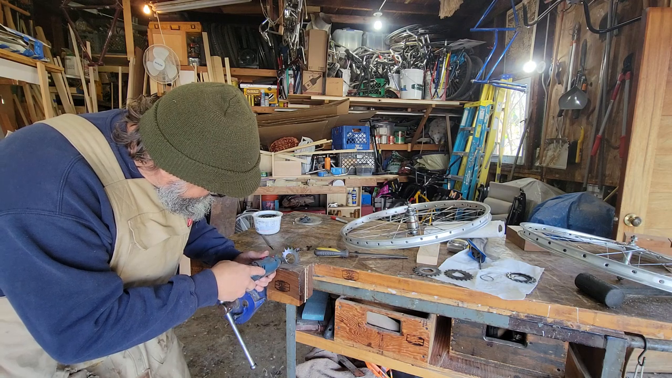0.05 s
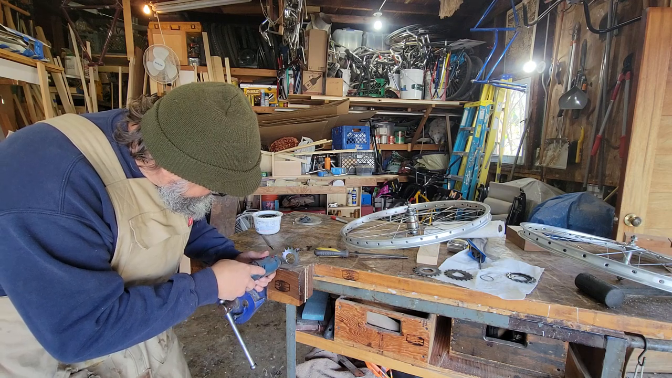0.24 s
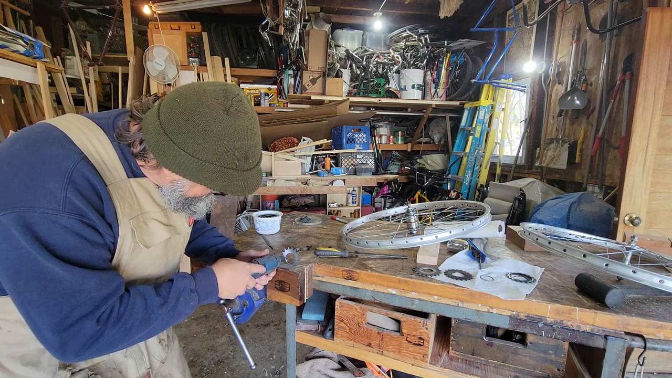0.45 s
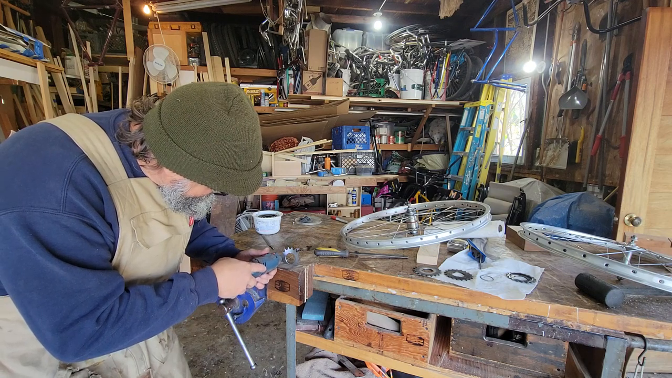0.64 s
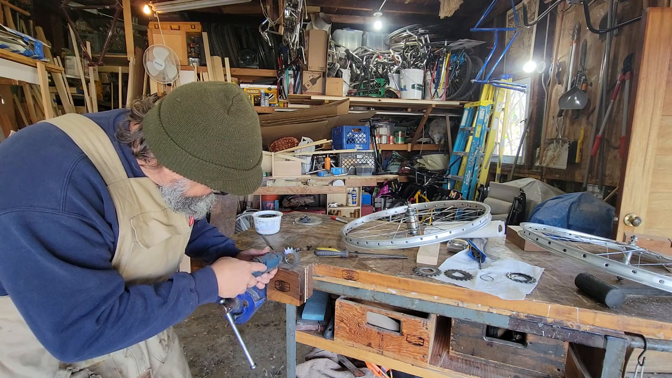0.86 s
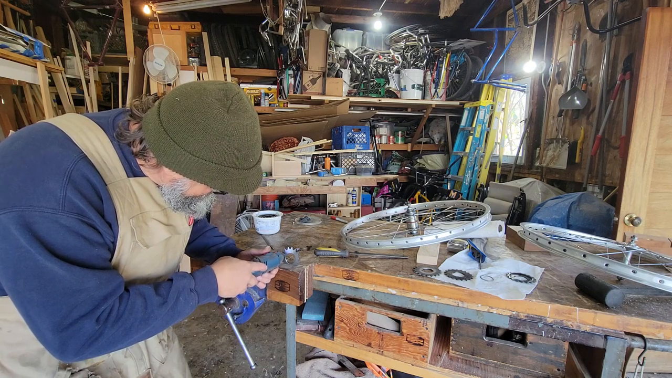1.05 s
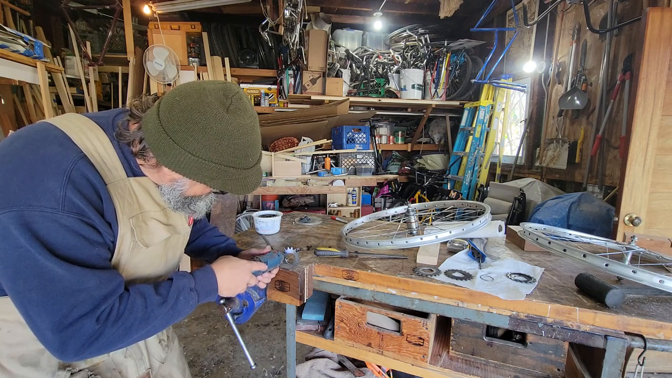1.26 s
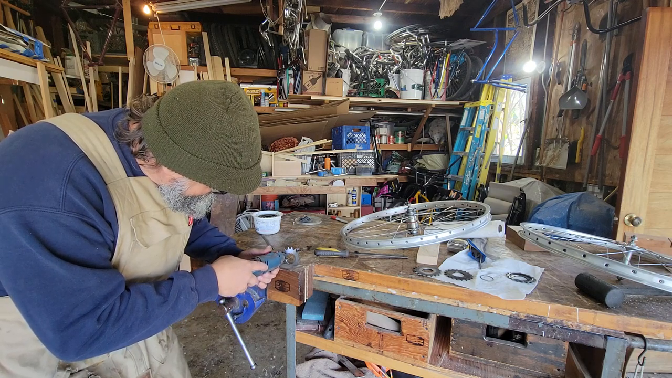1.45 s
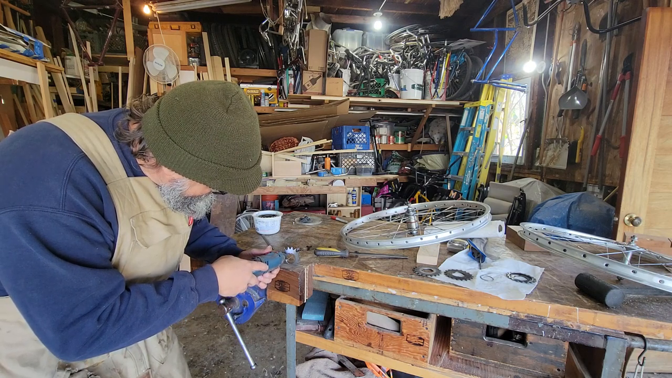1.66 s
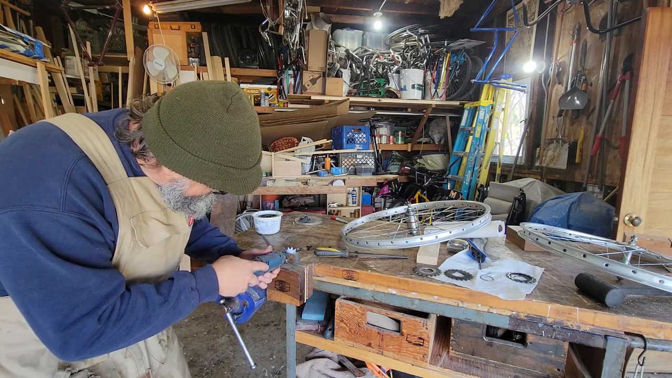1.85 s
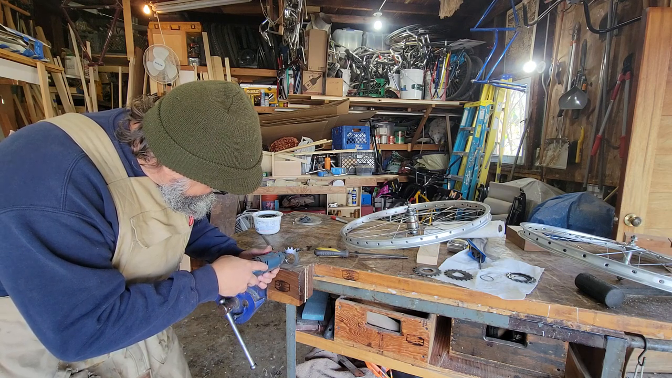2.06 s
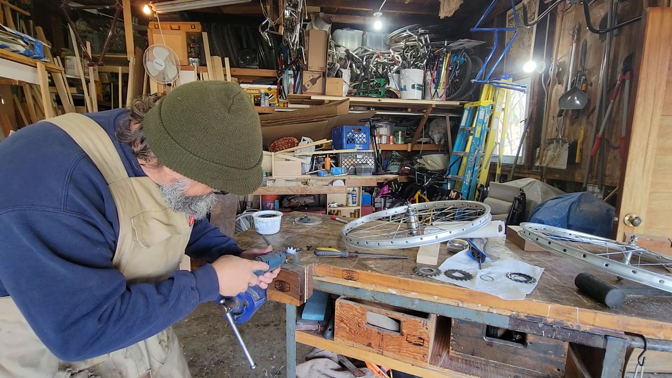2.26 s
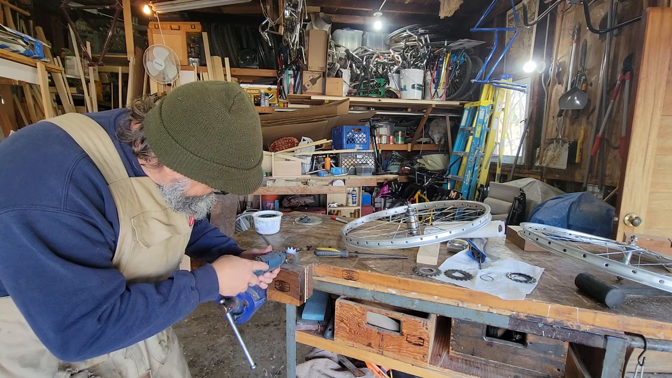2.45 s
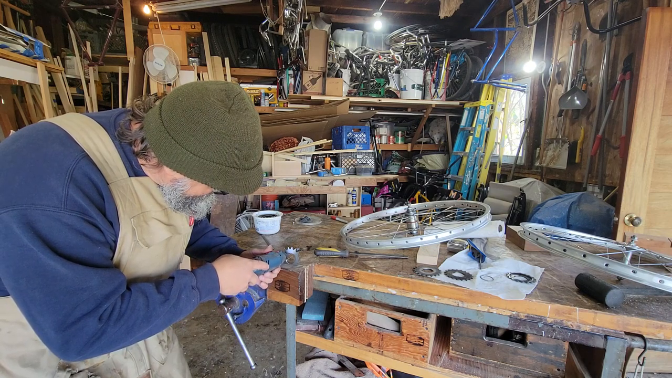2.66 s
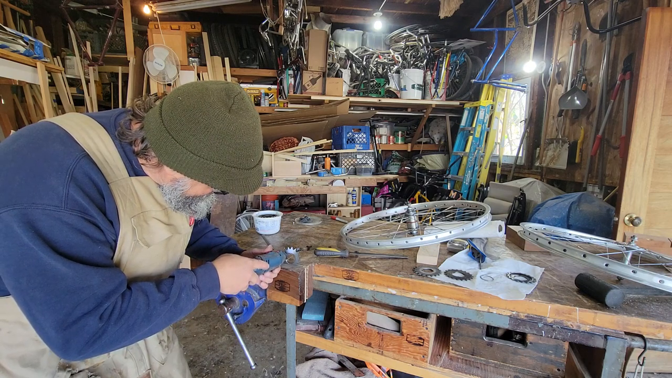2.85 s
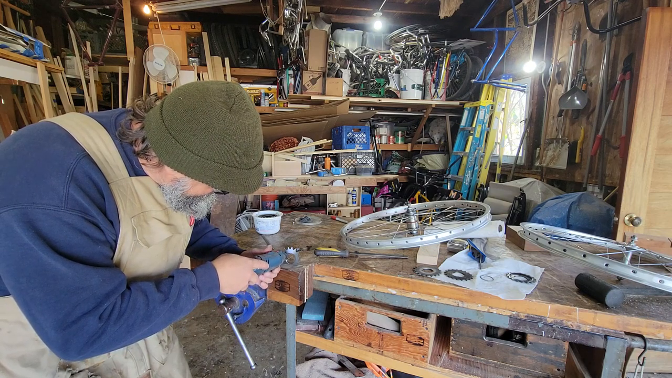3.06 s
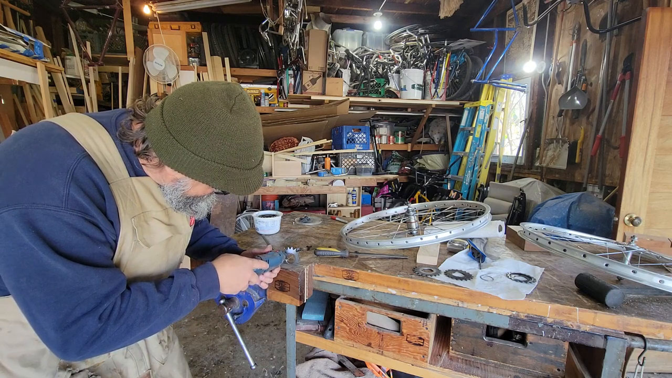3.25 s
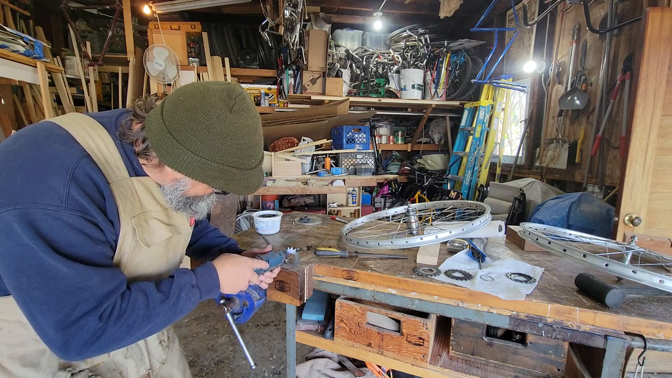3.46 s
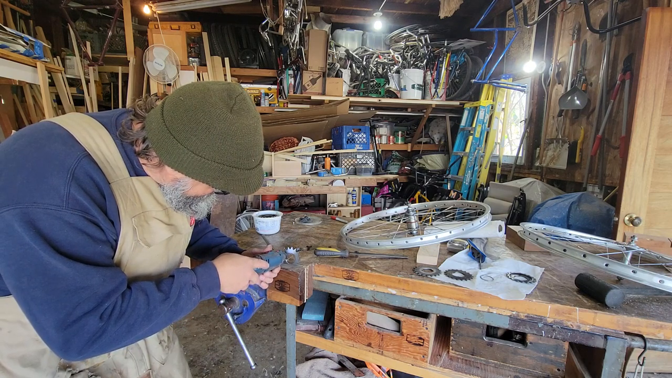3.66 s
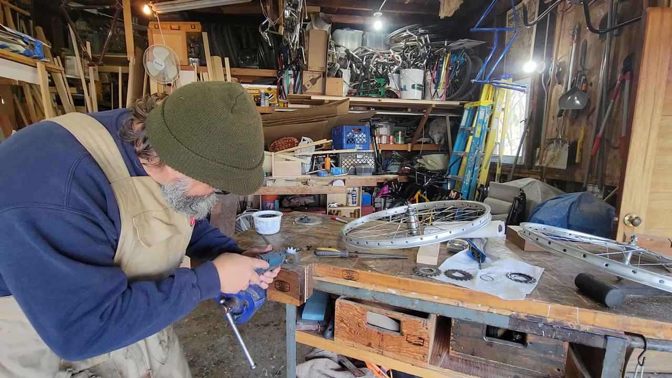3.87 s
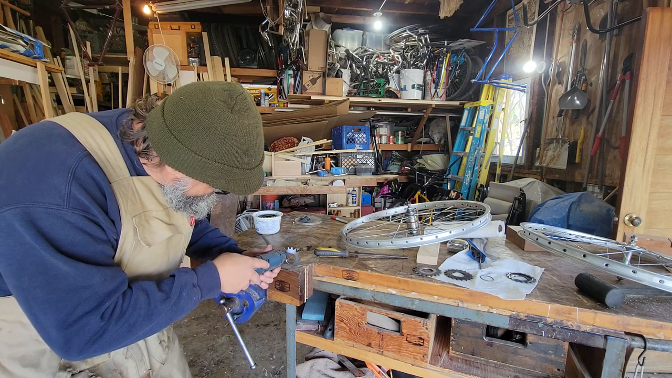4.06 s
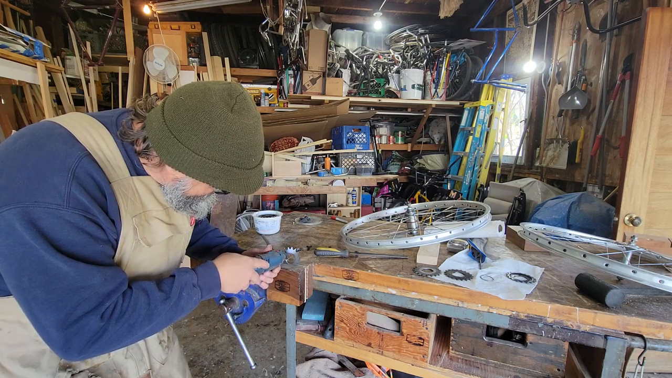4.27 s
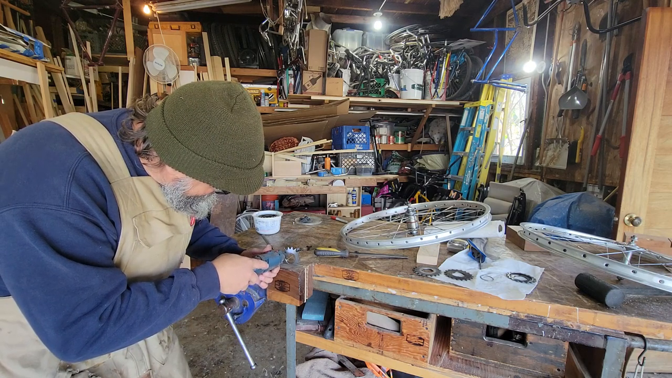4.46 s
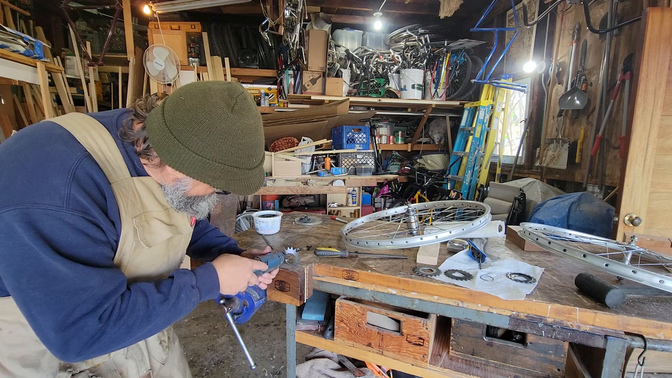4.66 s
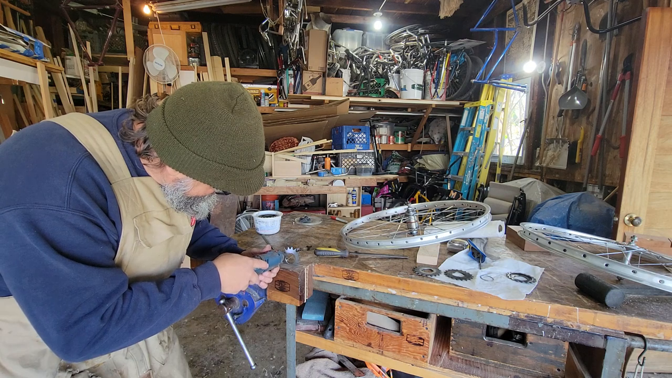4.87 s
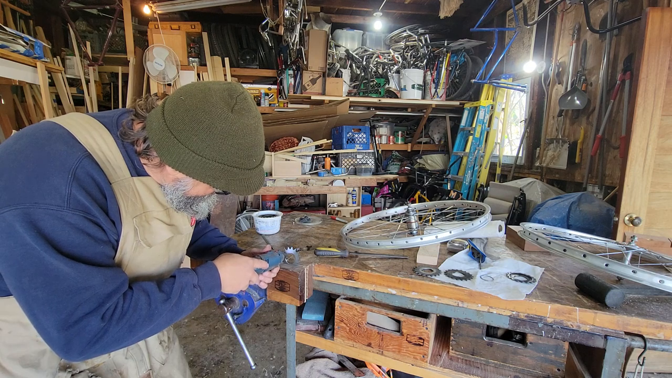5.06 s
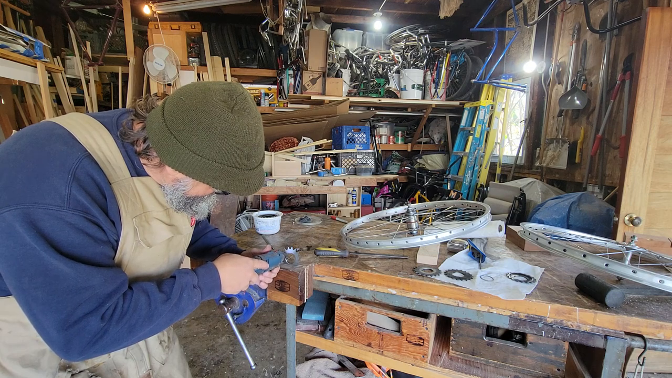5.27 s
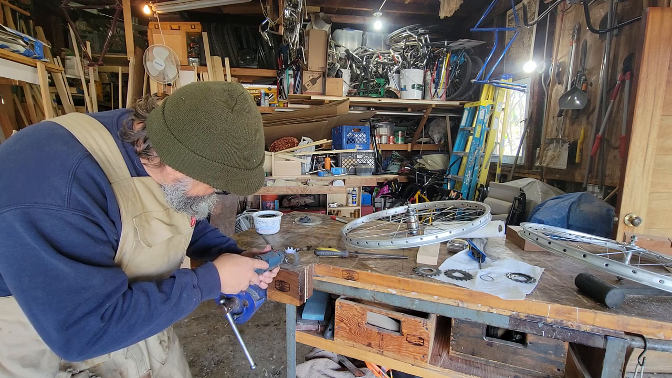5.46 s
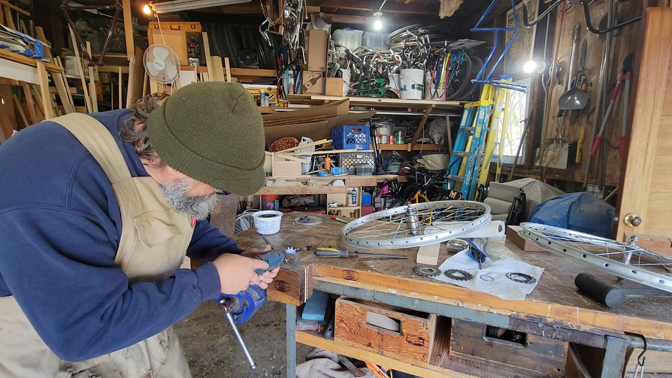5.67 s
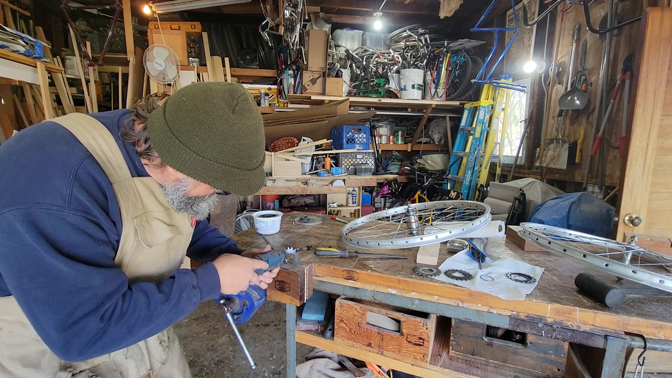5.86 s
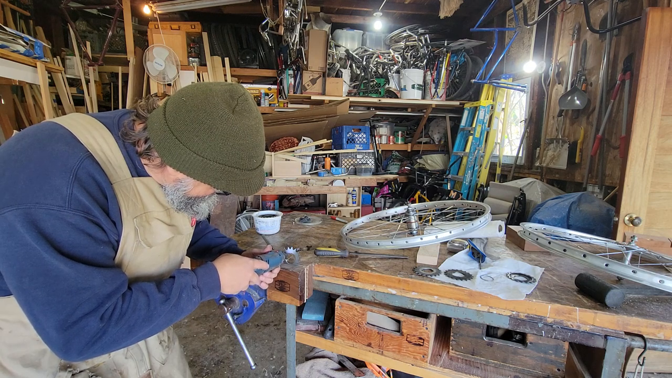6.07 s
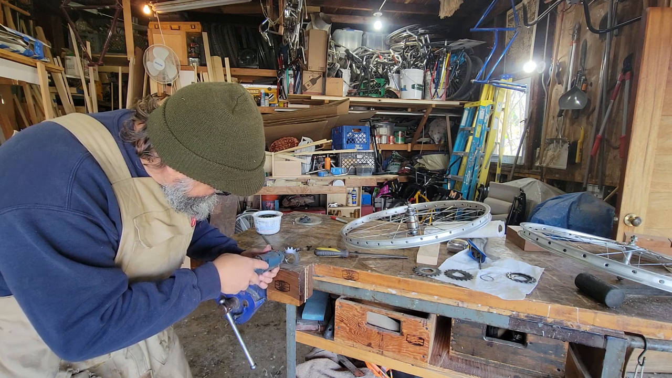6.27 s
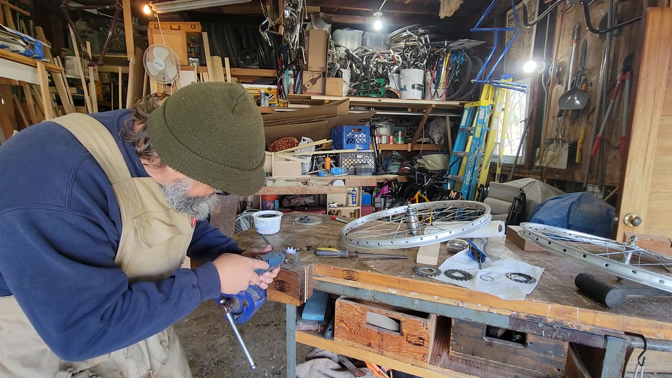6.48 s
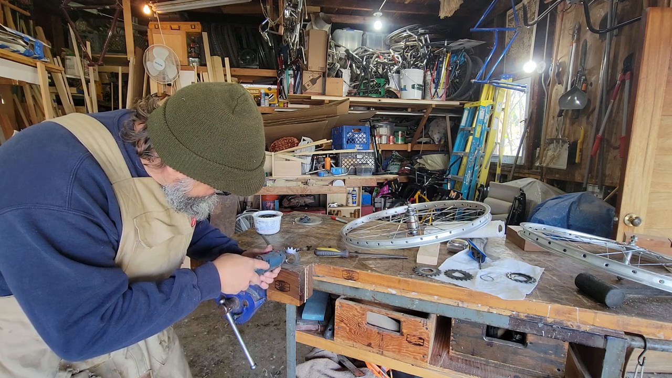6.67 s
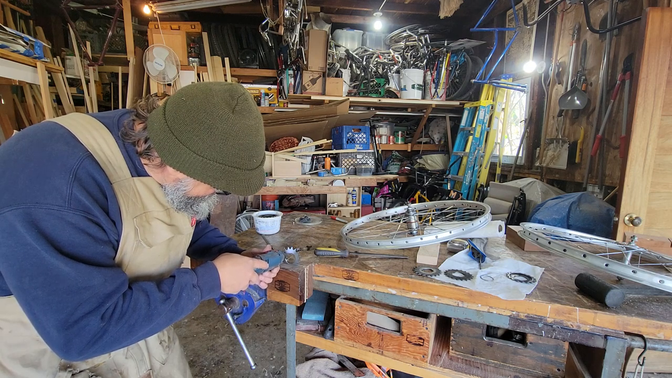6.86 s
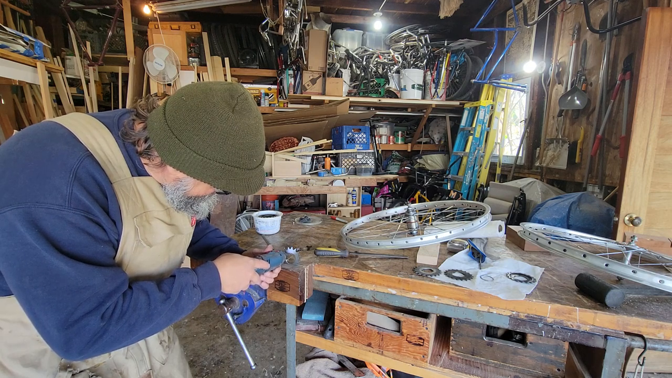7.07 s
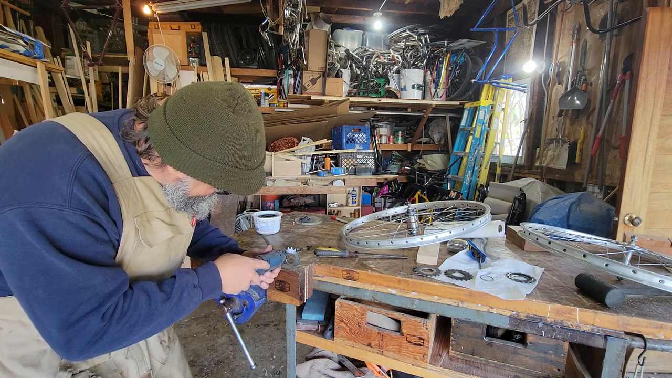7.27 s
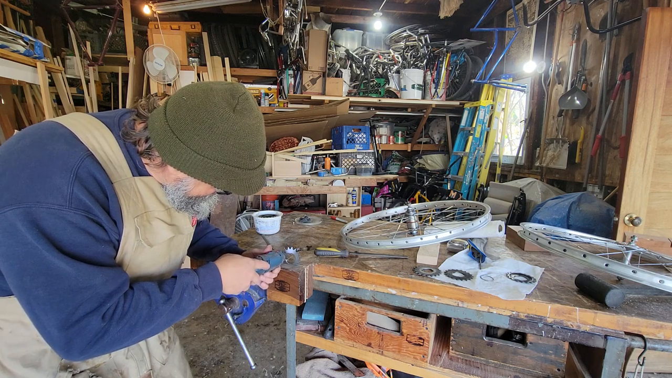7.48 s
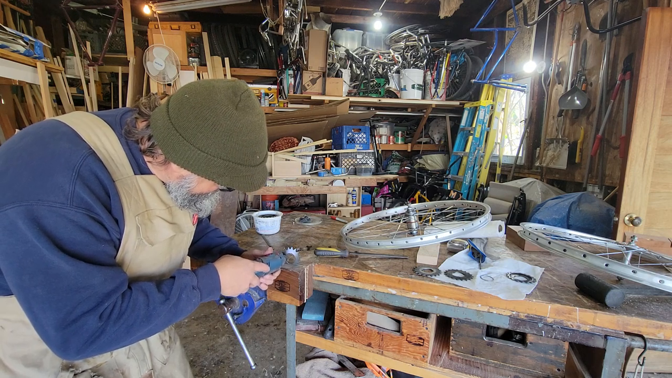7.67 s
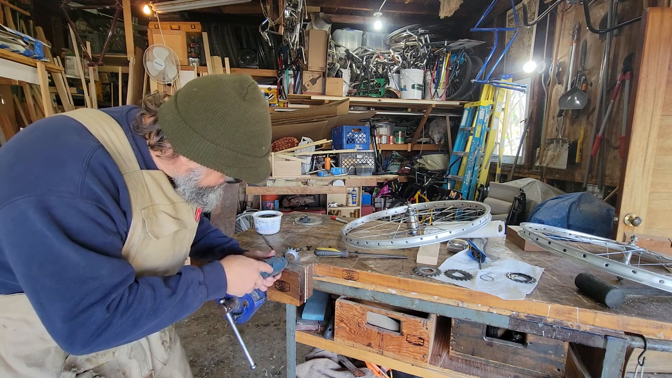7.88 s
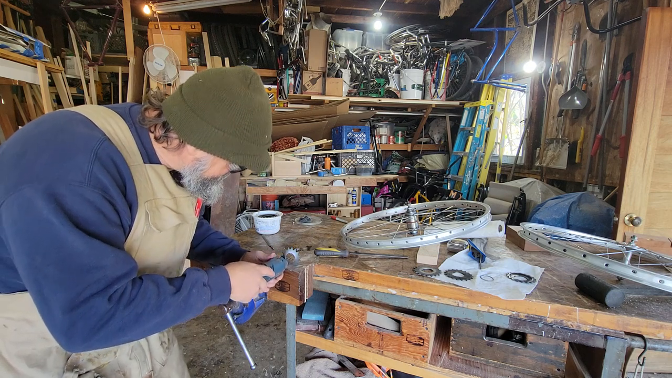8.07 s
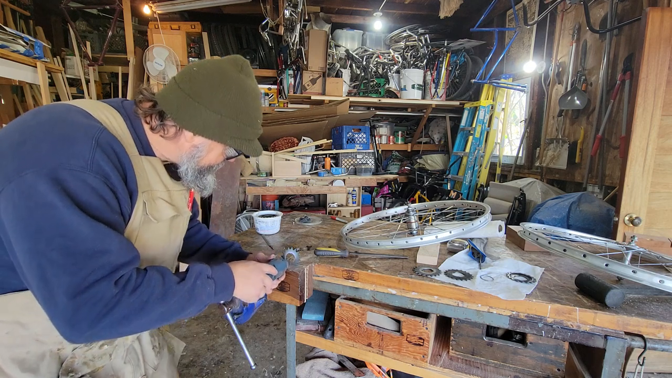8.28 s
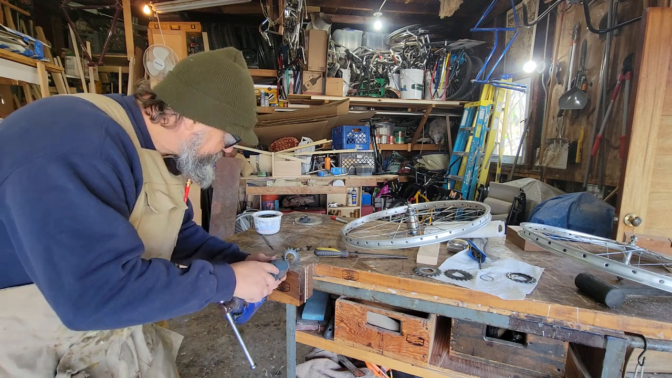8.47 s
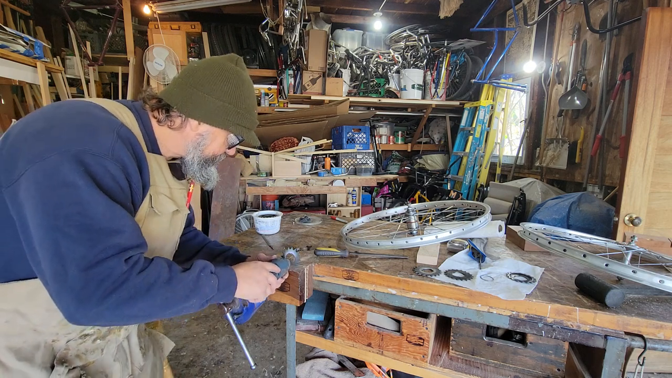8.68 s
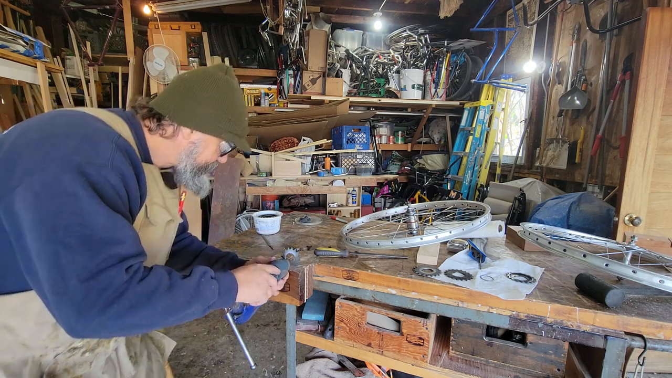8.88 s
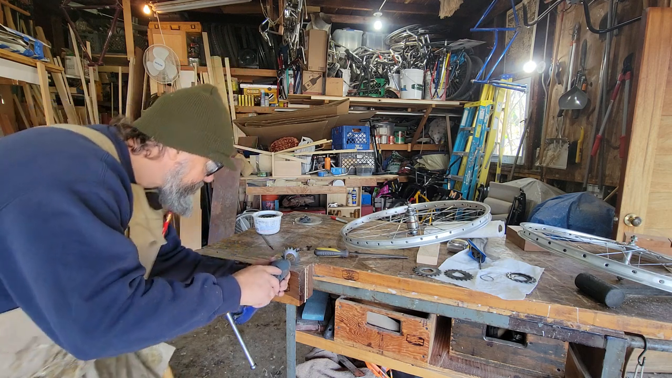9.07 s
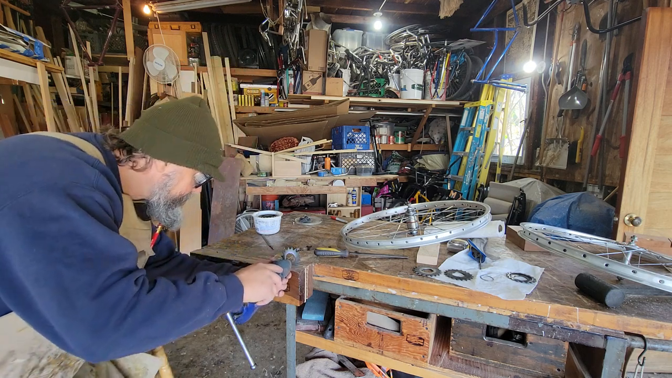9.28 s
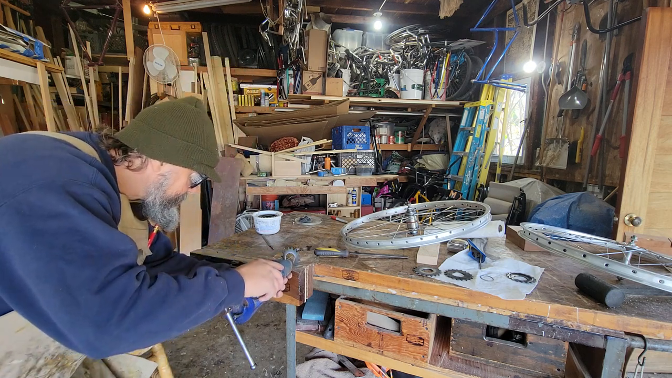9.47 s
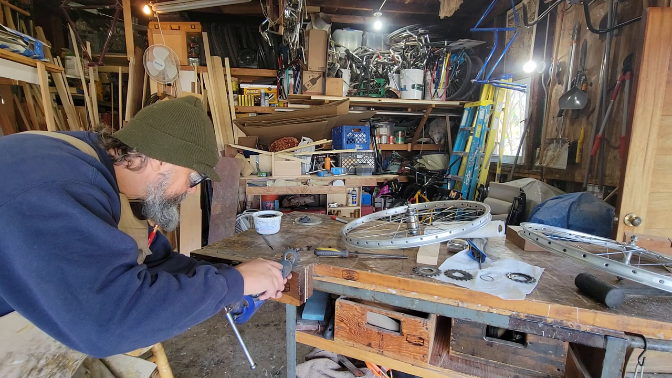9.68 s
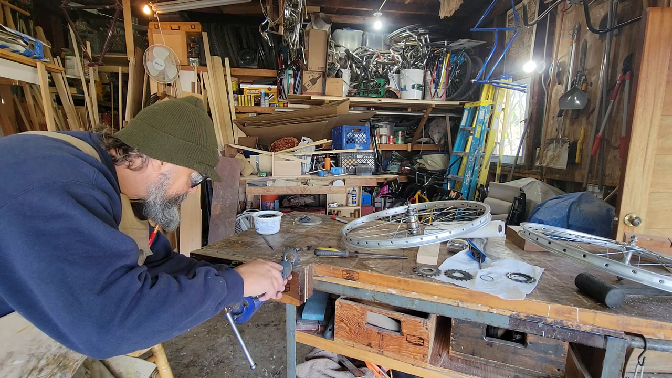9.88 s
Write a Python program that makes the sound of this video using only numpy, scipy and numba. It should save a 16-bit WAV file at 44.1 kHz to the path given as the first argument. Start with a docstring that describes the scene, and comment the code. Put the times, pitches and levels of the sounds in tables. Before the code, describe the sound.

Gritty, buzzing grinding of metal by a small electric tool, with one short lift, ends in steady motor whine and a brief wooden floor scuff.

```python
"""First comes the rasp of a rotary tool grinding a metal rod clamped at a workshop bench, left of a two-port
microphone. Blows once a turn build harmonics, pulsed noise makes the grit, and the shaft runs slower under load.
Twice the bit lifts and steady motor and bearing tones whine freely. Near the end wood scuffs and knocks on the
floor, as uneven pushes ringing resonances. Behind it all lie fan hiss and low room rumble, both shaped noise."""
import sys
import numpy as np
from scipy import signal
from scipy.io import wavfile
from scipy.ndimage import uniform_filter1d
from numba import njit

SR = 44100
rng = np.random.default_rng(int(sys.argv[2]) if len(sys.argv) > 2 else 0)


def log_audio(samples):
    """Write samples as a 16-bit WAV file to the path given in sys.argv[1]."""
    # one column per channel
    frames = np.atleast_2d(samples).T
    # limit to full scale, then quantise
    limited = np.clip(frames, -1, 1)
    pcm = np.round(limited * 32767).astype(np.int16)
    wavfile.write(sys.argv[1], SR, pcm)


N = 437904
HOP = 128  # samples per control frame

# Harmonics of the blow at usual pressure: [shaft multiple, level in first cut/dB, level in second cut/dB]
BLOW_HARMONICS = [(1, -42.5, -41), (2, -42.5, -41.5), (3, -31.5, -33), (4, -36, -36), (5, -32.5, -30),
                  (6, -40.5, -32), (7, -33, -27), (8, -38, -36), (9, -37.5, -39), (10, -34.5, -38.5),
                  (11, -35, -29.5), (12, -34.5, -32.5), (13, -31.5, -29), (14, -32.5, -30),
                  (15, -37.5, -36), (16, -37.5, -37.5), (17, -35.5, -31), (18, -38.5, -37),
                  (19, -45, -39.5), (20, -43, -40.5), (21, -45, -44), (22, -44.5, -41), (23, -43, -45),
                  (24, -48, -43), (25, -45, -42.5), (26, -50, -42), (27, -44, -45.5), (28, -46, -47),
                  (29, -46.5, -43.5), (30, -49, -44), (31, -53, -53), (32, -40, -44), (33, -46, -42),
                  (34, -42, -46), (35, -45, -42), (36, -49, -44), (37, -49, -37), (38, -44, -43),
                  (39, -48, -54), (40, -46, -41), (41, -44, -44), (42, -48, -44)]
# First shaft multiple of each zone of the rod and vice: [shaft multiple]
ZONE_STARTS = [1, 2, 3, 4, 5, 6, 7, 9, 15, 20, 43]
# How hard the bit presses: [t/s, level about the usual pressure/dB]
PRESSURE = [(0.0, 6), (0.07, -5.5), (0.1, 3.5), (0.15, 1), (0.32, 4.5), (0.38, 3.5), (0.44, 8.5),
            (0.52, 9.5), (0.62, 3), (0.89, 0.5), (1.11, -3), (1.16, 10.5), (1.25, 3), (1.42, -2),
            (1.52, -8), (1.59, 0.5), (1.74, 0.5), (1.85, -3.5), (2.12, -0.5), (2.24, -15), (2.28, -2.5),
            (2.48, -4.5), (2.52, -8), (2.69, -0.5), (2.73, -1.5), (3.27, -3), (3.34, -6), (3.38, -2),
            (3.43, -5.5), (3.48, 1), (3.54, -11), (3.58, -2), (3.7, 0.5), (3.73, -9), (3.76, -1), (3.87, 3),
            (3.95, -4.5), (3.99, 4.5), (4.16, 1.5), (4.28, 7), (4.33, -1), (4.42, -6), (4.88, -13.5),
            (5.1, -2), (5.37, 2), (5.59, 4.5), (5.66, -2.5), (5.7, 5), (5.83, 0), (5.88, -2.5), (5.95, 11),
            (6.0, 7.5), (6.11, 3.5), (6.16, -4), (6.27, 1.5), (6.32, -9), (6.39, 5), (6.48, 9),
            (6.57, -10.5), (6.65, -1), (6.72, -10), (6.79, 3), (6.92, -1), (6.96, 2), (7.01, 0.5),
            (7.05, -13), (7.09, -4.5), (7.14, -8), (7.39, -5), (7.46, 2.5), (7.52, 3.5), (7.56, -14.5)]
# Slow change of colour as the bit moves over the rod:
# [t/s, level of low multiples/dB, of the third/dB, of the fifth and sixth/dB, of the seventh and eighth/dB]
ROD_COLOUR = [(0.0, -2, -3, 7, 1), (0.11, -11, -10.5, -2.5, 1.5), (0.38, 2.5, 4.5, 4.0, 1),
              (0.6, -5.5, -0.5, 1.0, -6.0), (1.0, -2.0, -1.5, -4.5, 5), (1.05, 1.0, -5, -7, 9.5),
              (1.16, -9.5, -1, -3, -3.5), (1.36, -3, -4.5, -4, -4), (1.78, -11, 1, -4.5, 0.5),
              (1.87, -4, 1.5, -4.5, 0.5), (2.66, -5, 3, -2, -4.5), (3.12, 9.5, -6, 1.5, -1),
              (3.22, 2, -0.5, 1.0, 0.0), (3.37, 10.0, -2.5, 3.5, -1.5), (4.13, 5.5, -1.5, 4.5, -4),
              (4.42, 12.5, -1.5, 4, 2), (4.88, -2, 5, 2.0, -4), (5.09, -2, 1.0, -5, -2),
              (5.13, -2.0, 7.5, -3.5, -3), (5.4, -1, 9, 4, -1.0), (5.76, 0, -8.0, -1.5, 3.5),
              (6.07, -1, -2.5, 2.0, 0), (6.71, 0.5, -3, -2, -1.0), (6.97, -4, 9, 1.0, -1.5),
              (7.16, -3, -6, -3.5, 2.0), (7.3, 7.5, -4, 0, -1), (7.42, 1, -13, -6.0, 2.5),
              (7.48, -6, -6, -0.5, 2), (7.56, -3, -7, 5.5, -3)]
# Response, one row a zone: [pressure/(dB per dB), then the four colour columns/(dB per dB)]
ZONE_RESPONSE = [(0.22, 0.98, 0.097, 0, -0.23), (0.18, 0.32, 0.053, 0.21, 0.25),
                 (.15, -0.028, 0.96, -0.036, 0.14), (0.77, .95, .2, -0.25, 0.34),
                 (0.8, 0.17, 0.15, 0.79, 0.14), (1.05, -.1, -0.12, 1.27, -0.31),
                 (0.59, 0.095, -0.11, 0.29, 0.97), (0.51, 0.011, 0.075, -0.38, 0.18),
                 (0.82, -0.26, 0.12, -0.55, -0.53), (0.71, 0.051, 0, -0.54, -0.085)]


def strikes(t, loose_low=0.087, loose=0.43, drift_hz=23.0, slip=0.0086, spread=2.12, chatter_db=1.8, sway_db=2.14):
    """Harmonics of one blow a turn; the contact point wanders, so each swells and fades by itself."""
    orders, first_db, second_db = np.transpose(BLOW_HARMONICS)
    zone = np.searchsorted(ZONE_STARTS, orders, "right") - 1
    zones = len(ZONE_RESPONSE)

    controls = [*follow(PRESSURE, t), *follow(ROD_COLOUR, t)]
    sway_share = np.minimum(np.arange(zones) + 0.78, 1)[:, None]  # the lowest zone sways less
    zone_db = np.array(ZONE_RESPONSE) @ controls + sway_db * sway_share * wander(zones, 6.7).real
    cut_db = np.where(t < TOUCHES[1][0], first_db[:, None], second_db[:, None])
    level = gain_of(cut_db + zone_db[zone])
    # The bit chatters; the lowest hum is left out of it.
    chatter = gain_of(chatter_db * (orders > 1)[:, None] * wander(1, 25.0).real)
    level = level * chatter * judder(t, orders)

    chance = np.where(orders < ZONE_STARTS[7], loose_low, loose)[:, None]  # share of power that wanders
    left = np.sqrt(1 - chance) + np.sqrt(chance) * wander(len(orders), drift_hz)
    other = wander(len(orders), 1.74)
    other = other / (abs(other) + 0.036)  # echoes turn the phase at the far port more than the level

    late = slip * wander(1, 21.0).real + 0.0029 * wander(1, 84.0).real  # blow early or late, in turns
    angle = spread * rng.standard_normal((len(orders), 1)) + 2 * np.pi * orders[:, None] * late
    ports = pair(left, other, orders * 368, direct=0.98)
    return orders, np.sqrt(2) * level * contact(t, size=1) * np.exp(1j * angle) * ports


def judder(t, orders, beat_hz=53.0, first=3, last=8):
    """A skidding bit shakes the rod: harmonics first to last beat, each at its own moment."""
    shaken = (orders >= first) & (orders <= last)
    beat = np.exp(2j * np.pi * (beat_hz * t + rng.random((len(orders), 1))))
    depth = np.transpose(SKID_FLARES)[4] @ skids(t)
    return 1 + shaken[:, None] * depth * beat


# Skids, where the rasp flares:
# [t of the top/s, length/s, level under 3 kHz/dB, level above/dB, judder depth/0-1]
SKID_FLARES = [(0.304, 0.33, -25.5, -22.5, 0.86), (1.14, 0.11, -38, -24, 0.4), (2.88, 0.13, -38, -33, 0.3),
               (3.74, 0.16, -25.5, -27.5, 0.55), (4.415, 0.065, -28, -36, 0.5), (4.89, 0.15, -29, -28, .3),
               (6.596, 0.17, -29, -27, 0.7), (6.844, 0.083, -40, -32, 0.3), (7.085, .07, -24.5, -22, .4),
               (7.522, .1, -33, -28, 0.5)]


def skids(t):
    """Smooth rise and fall 0-1 of each skid."""
    top, length = np.transpose(SKID_FLARES)[:2, :, None]
    return np.cos(np.pi * np.clip((t - top) / length, -.5, .5)) ** 2


# Bit on the rod: [t the bit meets the rod/s, t it lifts/s]
TOUCHES = [(0, 4.438), (4.868, 7.575)]


def contact(t, size, ring_db_per_s=407):
    """1 while the bit is on the rod, dying away after it lifts; size smooths over samples of t."""
    held = sum((t >= start) * gain_of(-ring_db_per_s * np.maximum(t - end, 0)) for start, end in TOUCHES)
    return uniform_filter1d(held, size=size)


# Steady grit rasp at usual pressure: [t/s, level under 3 kHz/dB, level above/dB]
RASP_LEVEL = [(0, -36, -30.5), (.7, -48, -30.5), (1.3, -35, -32), (1.8, -41, -45), (2.1, -34.5, -31),
              (2.64, -36.5, -34), (3, -32, -28.5), (3.7, -34, -31), (4.4, -39, -31), (5, -34, -28.5),
              (5.5, -41, -30.5), (6.1, -41, -32), (6.8, -36.5, -29.5), (7.4, -38, -32)]
# Colour of the grit noise, relative: [f/Hz, level per Hz/dB]
GRIT_SPECTRUM = [(200, -41), (550, -25), (900, -15.5), (1300, -5.5), (2800, -9), (3500, -9), (4300, 1),
                 (6300, 3.5), (7300, -4.5), (10800, -5), (12400, -2), (15600, -12)]
# Bounces of the bit on the rod: [t/s, level of the blow/dB]
BOUNCES = [(4.465, -4), (4.871, -5), (4.894, -2)]
# Resonances of the tapped rod: [f/Hz, width/Hz, relative level/dB]
ROD_MODES = [(407, 18, -2.5), (1140, 120, -0.5), (1820, 120, -1), (2600, 220, -6), (5000, 300, -19),
             (6200, 300, -11)]


def rasp(turns, depth=0.27, split_hz=3400, bite=0.15):
    """Grit tearing at the metal: noise that pulses once a turn while the bit touches, and a few bounces."""
    t = np.arange(N) / SR

    def low_db(hz):
        return read(GRIT_SPECTRUM, hz) - 10 * np.log10(1 + (hz / split_hz) ** 8)

    def high_db(hz):
        return read(GRIT_SPECTRUM, hz) - 10 * np.log10(1 + (split_hz / (hz + 1)) ** 8)

    low = hiss(low_db, patchy_db=-2.0)
    high = hiss(high_db, patchy_db=5.5)
    power = gain_of(follow(RASP_LEVEL, t) + bite * follow(PRESSURE, t)) ** 2
    power = power + gain_of(np.transpose(SKID_FLARES)[2:4]) ** 2 @ skids(t) ** 2
    low_gain, high_gain = np.sqrt(power)

    pulse = evened(1 + depth * np.cos(2 * np.pi * turns))
    grit = (low_gain * evened(low) + high_gain * evened(high)) * contact(t, size=60) * pulse
    blows = np.zeros((2, N))
    for s, db in BOUNCES:
        blows[:, round(s * SR)] = gain_of(db)
    return grit + signal.oaconvolve(blows, ringing(ROD_MODES), axes=1)[:, :N]


# Motor tones, before damping:
# [shaft multiple, level at the rod/dB, level once turned away/dB, left minus right/dB]
MOTOR_TONES = [(1.0, -52, -58, 5), (2.0, -64, -61, 7), (3.0, -31, -35, 10), (4.0, -50, -44, 0),
               (5.0, -42, -46, -5), (6.0, -55, -47, 10), (7.0, -42, -40, 9), (9.0, -52, -47, 7),
               (10.0, -57, -60, 7), (12.0, -52, -49, -2), (13.0, -57, -60, 3), (15.0, -63, -59, 9),
               (17.0, -66, -59, 7), (18.0, -49, -58, 3), (19.0, -55, -61, 8), (20.0, -64, -58, 6),
               (21.0, -58, -59, 1), (22.0, -59, -56, 6), (23.0, -60, -61, 7), (25.0, -62, -58, 4),
               (26.0, -66, -63, 4), (28.0, -62, -58, 8), (29.0, -70, -61, 7), (30.0, -65, -63, 7),
               (31.0, -63, -62, 5), (32.0, -66, -67, 6), (33.0, -63, -58, 3), (34.0, -63, -64, 0),
               (35.0, -65, -61, -1), (36.0, -63, -59, 7), (37.0, -62, -68, 1), (38.0, -64, -63, -2),
               (39.0, -67, -59, 2), (40.0, -61, -62, 9), (41.0, -62, -59, -4)]
# Bearing tones beside them, mostly an eighth of a turn apart, before damping:
# [shaft multiple, level at the rod/dB, level once turned away/dB, left minus right/dB]
BEARING_TONES = [(1.875, -54, -59, 2), (2.125, -58, -51, 3), (3.08, -52, -55, 1), (3.125, -43, -44, 8),
                 (3.875, -56, -53, 0), (3.92, -57, -55, 8), (4.08, -47, -47, 11), (4.125, -51, -49, 5),
                 (4.25, -53, -54, 1), (4.875, -54, -55, 1), (5.125, -51, -55, 2), (5.36, -57, -57, -2),
                 (6.125, -58, -57, 3), (6.36, -62, -56, 8), (6.875, -53, -51, 4), (7.125, -47, -43, 10),
                 (7.25, -56, -55, 6), (8.125, -54, -52, 4), (8.25, -58, -55, 0)]
# The hand turns the tool away: [t/s, how far/0-1]
TURNED_AWAY = [(8.3, 0), (8.8, 1)]


def motor(t, loose=.12, drift_hz=1.5, shake=.001, damping=.7):
    """Steady tones of commutator, fan and bearings, wavering as the hand moves the tool."""
    table = np.concatenate([MOTOR_TONES, BEARING_TONES])
    orders, near_db, away_db, side_db = np.transpose(table)[:, :, None]
    turned = follow(TURNED_AWAY, t)

    lead = read(PORT_PAIR, orders[:, 0] * 379)[1][:, None]
    lead = np.where(orders < 18, np.minimum(.18 * orders, 2.2), lead)  # the tool sits nearer the middle than the rod
    lead = np.where(orders % 1 > 0, 1.9, lead)  # the bearing tones come from the side of the housing

    start = np.exp(2j * np.pi * (rng.random(orders.shape) + shake * orders * wander(1, 30.0).real))
    left, right = (start * (1 + loose * wander(len(orders), drift_hz)) for _ in range(2))
    sides = np.array([left * gain_of(side_db / 2), right * np.exp(-1j * lead) / gain_of(side_db / 2)])
    sides /= np.sqrt(np.cosh(side_db * np.log(10) / 10))  # lowers both ports, the more so the more left and right differ

    # Pressing on the rod damps the housing; the damping eases 0.12 s ahead of each lift.
    pressed = uniform_filter1d(contact(t + 0.12, size=1) * contact(t, size=1), size=8)
    sides *= 1 - damping * pressed
    level = gain_of((1 - turned) * near_db + turned * away_db)
    return orders[:, 0], np.sqrt(2) * level * sides


# Scuff on the floor: [t/s, level of the force before slip_db/dB]
SCUFF_FORCE = [(8.52, -43), (8.552, -27.5), (8.61, -14.5), (8.648, -16.5), (8.668, -23), (8.698, -24),
               (8.826, -49), (8.84, -39)]
# Knocks on the floor: [t/s, level of the blow before knock_db is subtracted/dB]
FLOOR_KNOCKS = [(8.559, -31), (8.603, -29), (8.69, -32)]
# Resonances of the wood: [f/Hz, width/Hz, relative level/dB]
WOOD_MODES = [(72, 25, -12), (100, 32, 3), (177, 20, -2), (293, 50, 0), (484, 50, -1.5), (660, 47, 1),
              (860, 130, -3.5), (1000, 51, -4.5), (1440, 320, -4)]


def scuff(per_s=900, knock_db=-24, slip_db=-6):
    """Uneven slips, at random about per_s a second, and a few knocks ring the wood."""
    t = np.arange(N) / SR
    slips = rng.standard_normal((2, N)) * (rng.random(N) < per_s / SR)
    slips[1] = .92 * slips[0] + .4 * slips[1]  # the ports hear nearly the same slips
    force = slips * np.sqrt(SR / per_s) * gain_of(follow(SCUFF_FORCE, t, off=-120) + slip_db)
    for s, db in FLOOR_KNOCKS:
        force[:, round(s * SR)] -= gain_of(db - knock_db)
    force = uniform_filter1d(force, size=8, axis=1)  # soft contact: each push lasts a moment
    return signal.oaconvolve(force, ringing(WOOD_MODES), axes=1)[:, :N]


# Colour of the cooling air, relative: [f/Hz, level per Hz/dB]
FAN_SPECTRUM = [(120, -36), (250, -20.5), (550, -12.5), (690, -3), (900, -7.5), (1300, 1.5), (1900, 0),
                (2300, -3.5), (2750, -1.5), (3500, -5.5), (4500, -4.5), (5500, -7), (7300, -6.5),
                (8400, -7), (9400, -6), (11000, -12.5), (12400, -7.5), (15600, -12)]
# Colour of the room rumble, relative: [f/Hz, level per Hz/dB]
RUMBLE_SPECTRUM = [(12, -46), (20, -14), (32, -13), (44, -6), (62, 7.5), (80, 2), (104, -8), (125, -20),
                   (140, -28), (200, -11.5), (260, -46), (440, -120)]


def air(fan_db=-34.5, rumble_db=-59):
    """Background noise: cooling-fan hiss, less alike at the ports, and the low rumble of the room."""
    fan = hiss(lambda hz: read(FAN_SPECTRUM, hz), patchy_db=1.0, direct=0.32)
    rumble = hiss(lambda hz: read(RUMBLE_SPECTRUM, hz), patchy_db=0.8)
    return gain_of(fan_db) * evened(fan) + gain_of(rumble_db) * evened(rumble)


# Between the microphone ports: [f/Hz, likeness/0-1, phase by which left leads/rad, left minus right/dB]
PORT_PAIR = [(100, .96, 0, 0), (200, .9, .2, 0), (370, .85, 1.9, 4.5), (740, .75, 1.9, 3),
             (1100, .7, 1.6, 2), (2600, .7, 1.9, 5), (3500, .8, 2.8, 3), (4800, .9, 3.1, 2),
             (6300, .75, 3.5, 2), (7200, .3, 4.9, 3), (9300, .45, 6.4, 2), (10800, .45, 8.2, 3),
             (11600, .1, 9.4, 2), (15600, .1, 11.0, 2.5)]


def pair(left, other, hz, direct=1):
    """Spreads a spectrum over the two ports: the right mixes the left with an unlike part, later in phase."""
    same, lead, side_db = (c[:, None] for c in read(PORT_PAIR, hz))
    same = np.clip(same * direct, 0, 1)
    right = (same * left + np.sqrt(1 - same ** 2) * other) * np.exp(-1j * lead)
    return np.array([left * gain_of(side_db / 2), right / gain_of(side_db / 2)])


def hiss(level, patchy_db, direct=1):
    """Two-port noise coloured by level(hz) in dB, with random patches in time and pitch."""
    frames, hz = N // 256 + 5, np.fft.rfftfreq(1024, 1 / SR)
    a, b, c, d, patches = rng.standard_normal((frames, 513, 5)).T
    patches = uniform_filter1d(patches, size=12, axis=0)
    patches = evened(uniform_filter1d(patches, size=10, axis=1))
    ports = pair(a + 1j * b, c + 1j * d, hz, direct)
    spectrum = ports * gain_of(level(hz)[:, None] + patchy_db * patches)
    return signal.istft(spectrum, nperseg=1024, noverlap=768)[1][:, :N]


def ringing(modes):
    """Answer of a struck body, energy 1: decaying sines of alternating sign, without steady push."""
    t = np.arange(8000) / SR
    ring = np.zeros(len(t))
    for k, (hz, width, db) in enumerate(modes):
        decay = np.sqrt(width) * np.exp(-np.pi * width * t)
        ring += gain_of(db) * decay * np.sin(2 * np.pi * hz * t) * (-1) ** k
    ring = signal.sosfilt(signal.butter(2, 55, "high", fs=SR, output="sos"), ring)
    return ring[None] / np.linalg.norm(ring)


@njit
def tones(turns, orders, heights, hop):
    """Sums multiples of the shaft rotation, each with a complex height per port and frame."""
    out = np.zeros((2, len(turns)))
    for k in range(len(orders)):
        for i in range(len(turns)):
            j, u = i // hop, (i % hop) / hop
            spin = np.exp(2j * np.pi * orders[k] * turns[i])
            for ch in range(2):
                out[ch, i] += (spin * ((1 - u) * heights[ch, k, j] + u * heights[ch, k, j + 1])).real
    return out


def wander(count, hz):
    """Complex chance of rms 1 at frame rate, changing about hz times a second."""
    frames = N // HOP + 2
    f = np.fft.fftfreq(frames, HOP / SR)
    z = rng.standard_normal((count, frames)) + 1j * rng.standard_normal((count, frames))
    return evened(np.fft.ifft(z / (1 + (f / hz) ** 2), axis=1))


def gain_of(db):
    """Decibels to gain."""
    return 10 ** (np.asarray(db) / 20)


def evened(x):
    """Scales to rms 1."""
    return x / np.sqrt(np.mean(abs(x) ** 2) + 1e-20)


def read(points, hz):
    """Columns of a table at the given frequencies, interpolated over log frequency."""
    f, *columns = np.transpose(points)
    return np.squeeze([np.interp(np.log(hz + 1), np.log(f + 1), c) for c in columns])


def follow(rows, t, off=None):
    """Columns of a curve at the given times; off, if given, holds outside it."""
    s, *columns = np.transpose(rows)
    return np.array([np.interp(t, s, c, off, off) for c in columns])


# Shaft speed, lower under load: [t/s, f/Hz]
SHAFT_SPEED = [(0.0, 368.4), (0.18, 371.3), (0.52, 366.2), (0.8, 369.8), (1.24, 369.2), (1.42, 371.6),
               (1.88, 374.6), (2.12, 372.1), (2.32, 373.6), (2.56, 374.3), (2.74, 374.7), (2.86, 371.9),
               (3.62, 369.0), (3.72, 368.6), (3.78, 365.6), (3.84, 367.0), (4.22, 364.7), (4.26, 363.8),
               (4.38, 363.3), (4.42, 366.1), (4.68, 373.8), (4.84, 376.3), (5.12, 374.9), (5.56, 362.4),
               (5.78, 358.8), (5.98, 358.7), (6.06, 356.3), (6.22, 358.1), (6.26, 357.7), (6.38, 362.6),
               (6.46, 361.5), (6.6, 362.6), (6.74, 365.9), (6.86, 365.5), (6.98, 368.2), (7.46, 369.6),
               (7.56, 364.4), (7.64, 370.8), (7.84, 374.8), (8.06, 377.1), (8.44, 378.7), (9.92, 379.2)]


def scene():
    """Tool and rod share one shaft rotation; the scuff and the background air are added."""
    turns = np.cumsum(follow(SHAFT_SPEED, np.arange(N) / SR)[0]) / SR
    t = np.arange(N // HOP + 2) * HOP / SR
    blow_orders, blows = strikes(t)
    motor_orders, whine = motor(t)
    orders = np.concatenate([blow_orders, motor_orders])
    heights = np.concatenate([blows, whine], axis=1)
    return tones(turns, orders, heights, HOP) + rasp(turns) + air() + scuff()


def record(dry, edge_hz=15760):
    """The band limit: a steep low-pass at edge_hz."""
    lowpass = signal.firwin(1023, edge_hz, window=("kaiser", 10), fs=SR)
    return signal.oaconvolve(dry, lowpass[None], "same")


dry = scene()
out = record(dry)
log_audio(out)
```